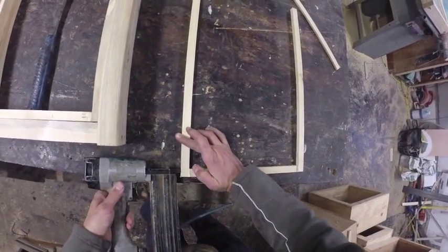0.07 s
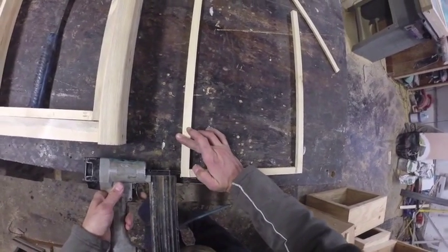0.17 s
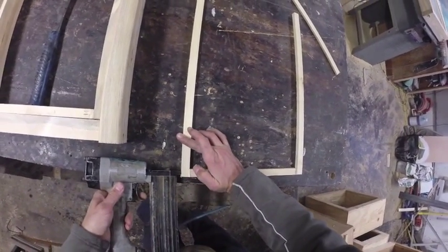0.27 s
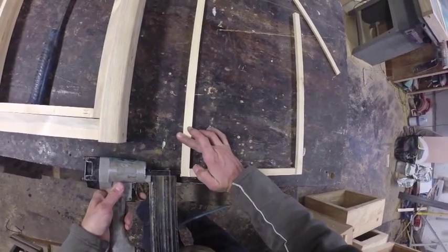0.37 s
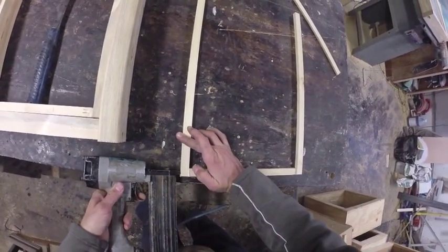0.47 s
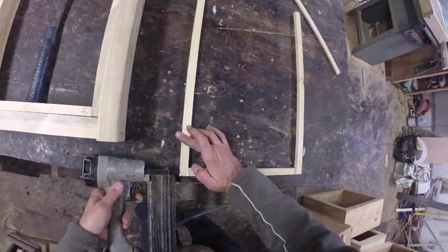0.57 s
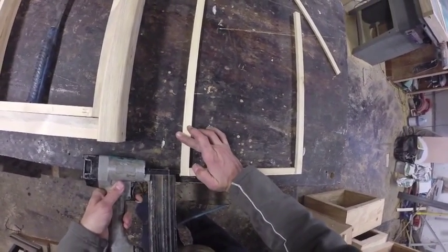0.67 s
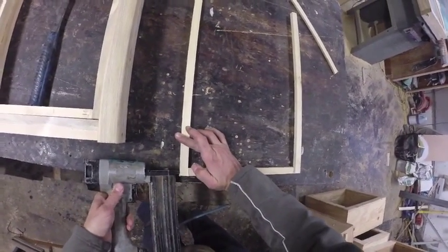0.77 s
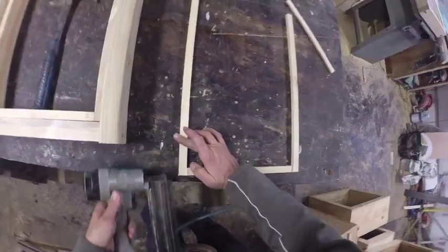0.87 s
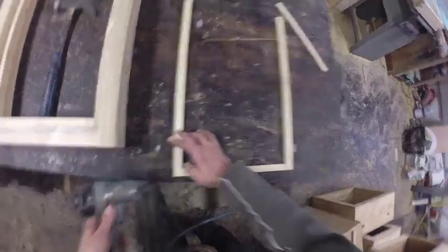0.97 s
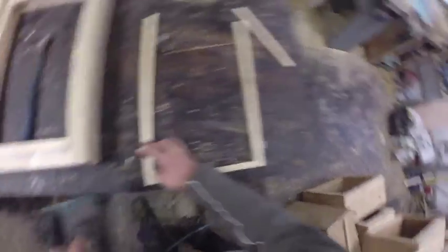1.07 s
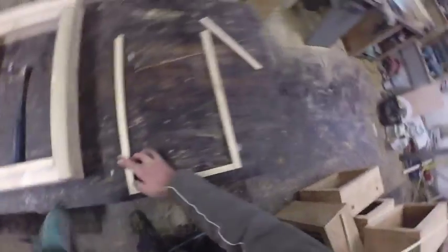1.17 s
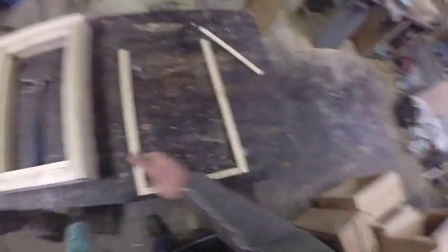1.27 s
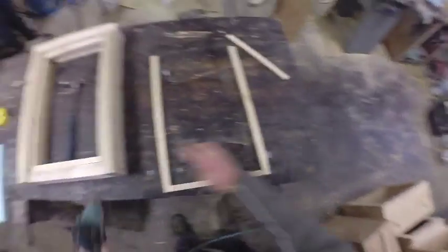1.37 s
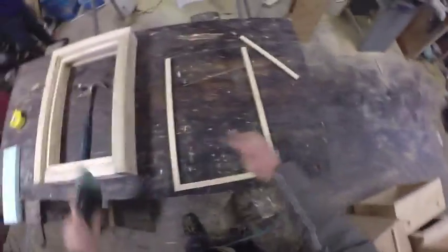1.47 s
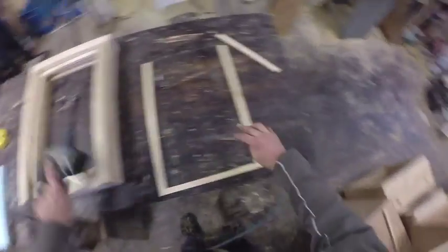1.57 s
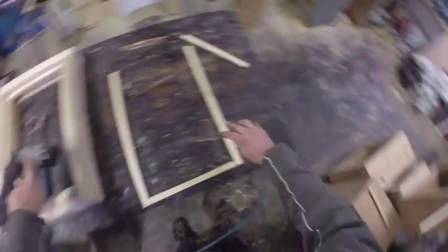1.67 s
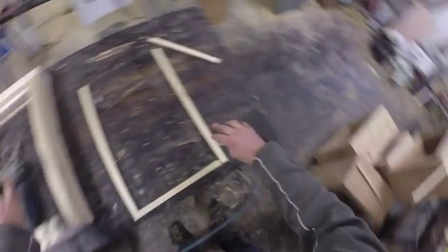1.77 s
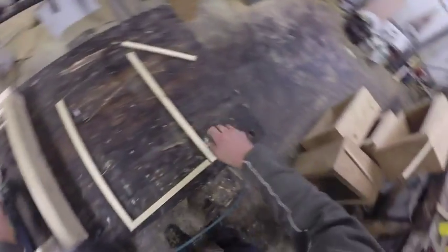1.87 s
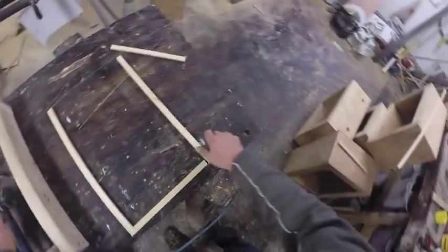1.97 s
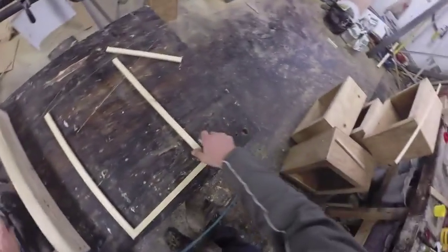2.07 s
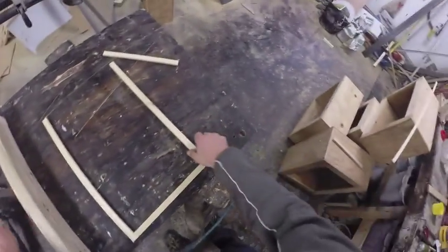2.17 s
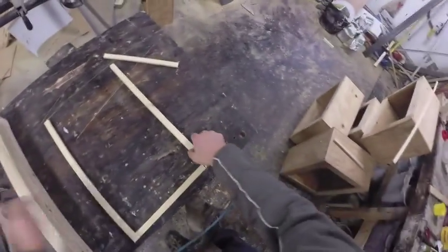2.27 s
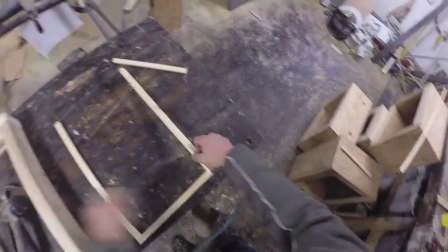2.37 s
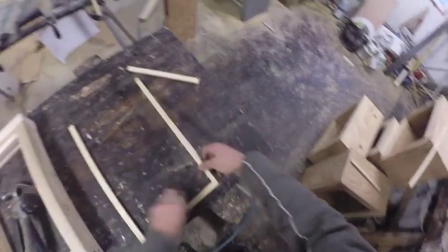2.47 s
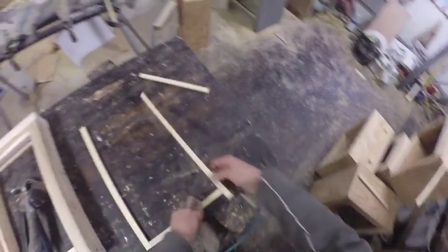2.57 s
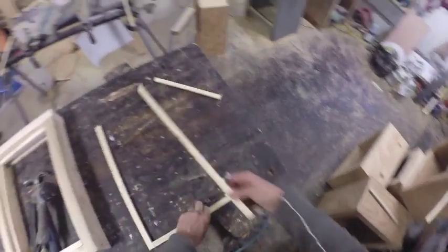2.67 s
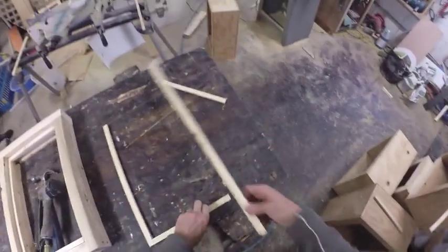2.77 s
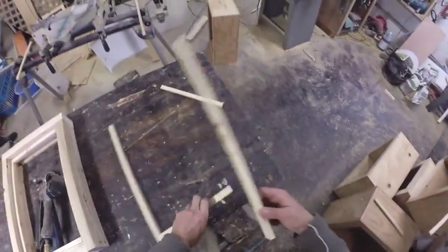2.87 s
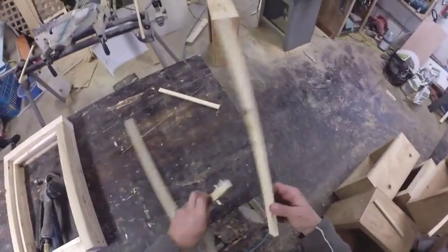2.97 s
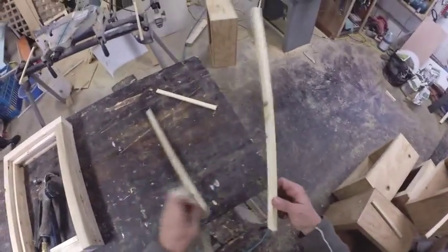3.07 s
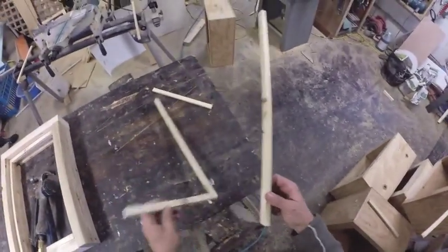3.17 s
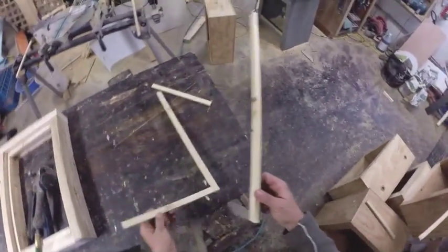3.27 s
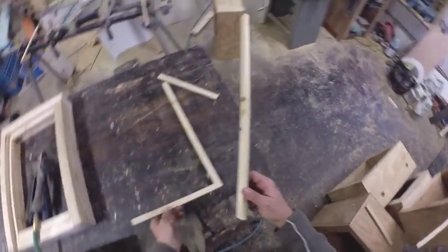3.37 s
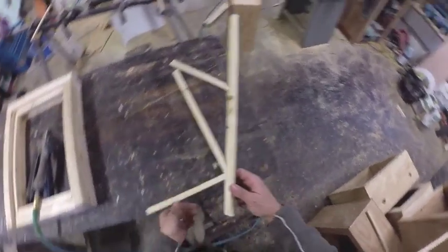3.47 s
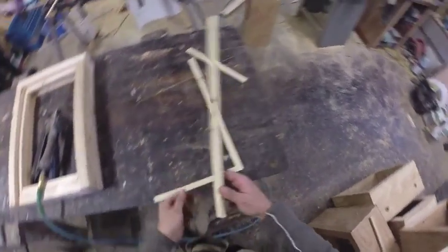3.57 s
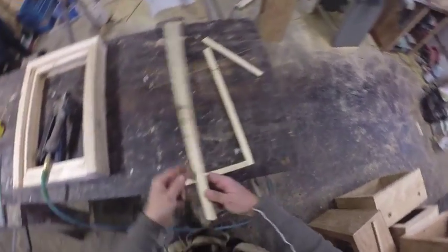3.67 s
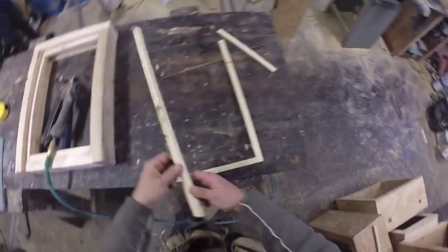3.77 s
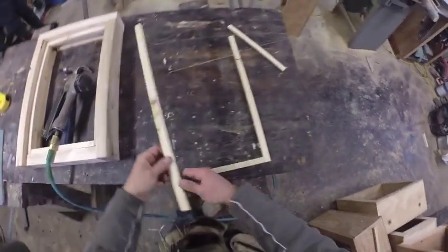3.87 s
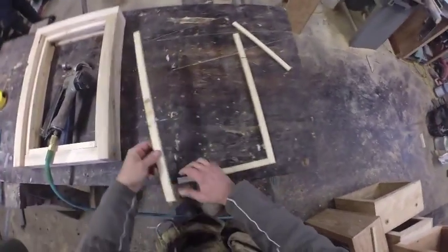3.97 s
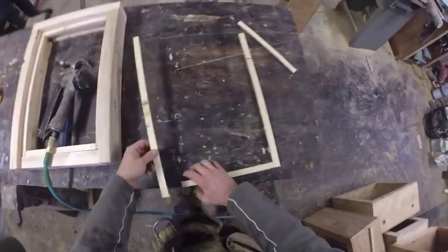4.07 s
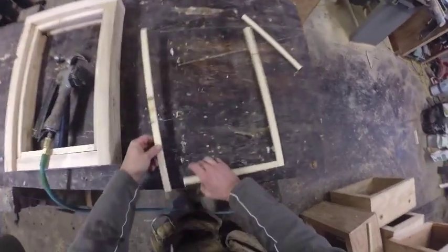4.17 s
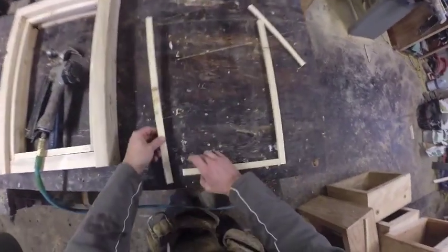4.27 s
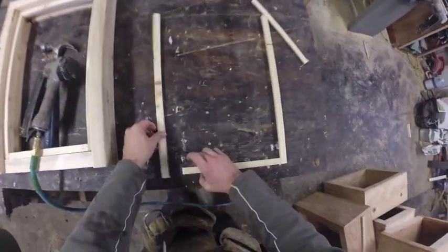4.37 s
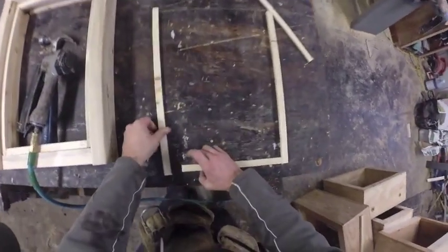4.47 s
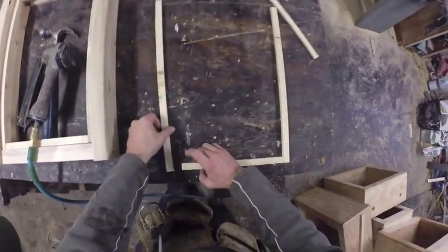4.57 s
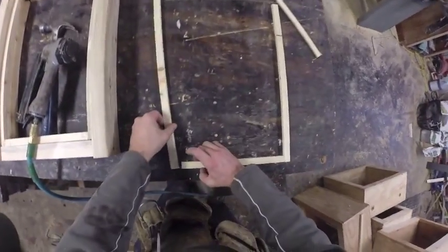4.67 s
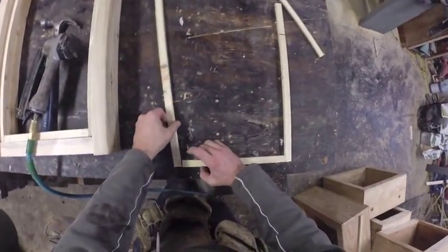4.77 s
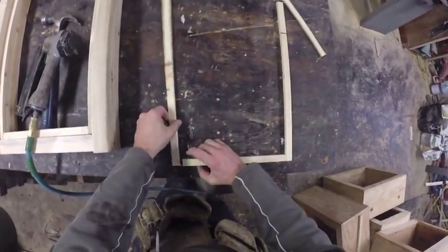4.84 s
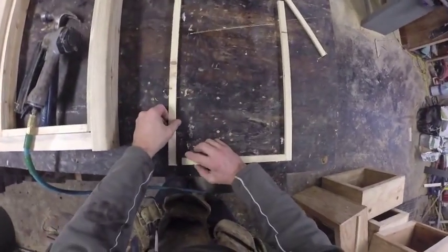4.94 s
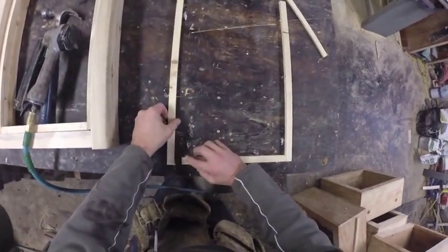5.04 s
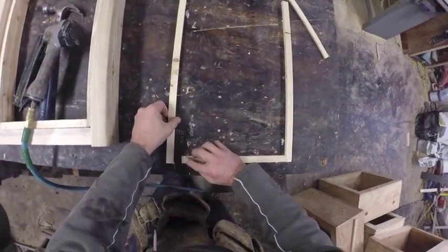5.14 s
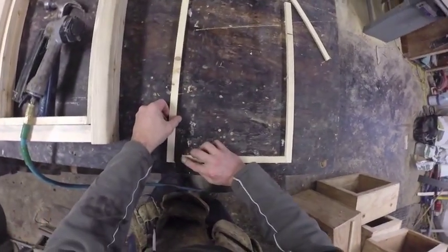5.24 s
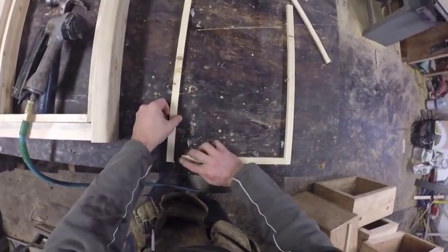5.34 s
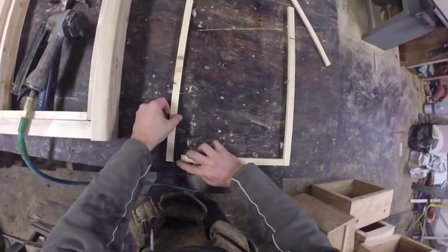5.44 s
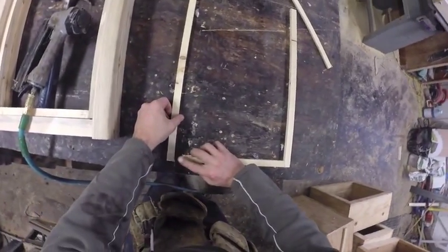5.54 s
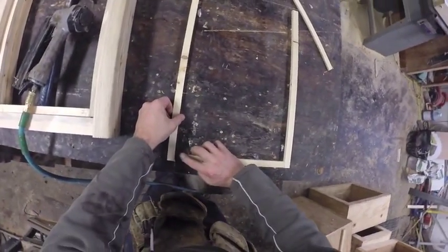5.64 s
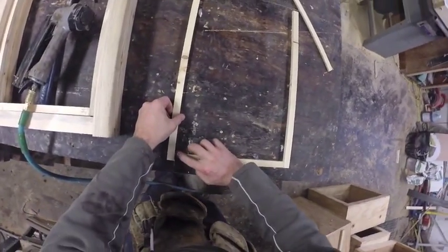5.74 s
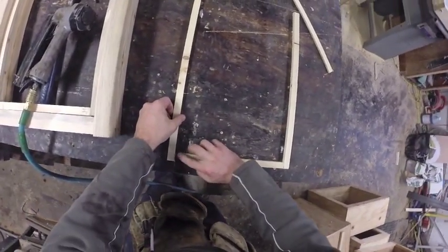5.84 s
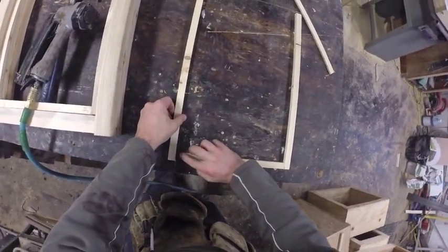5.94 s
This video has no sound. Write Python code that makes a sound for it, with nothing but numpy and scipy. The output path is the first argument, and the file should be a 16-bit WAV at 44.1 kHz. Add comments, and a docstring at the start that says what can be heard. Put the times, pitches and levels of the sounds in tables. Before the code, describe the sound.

Two sharp pneumatic nailer shots with exhaust puffs and fading hisses, then the tool thuds down and wooden strips clack on a workbench.

```python
"""A pneumatic nailer at work in a workshop, heard up close on one body-worn microphone.
Two shots come first, each a bang, a puff of exhaust and a dying hiss; valve air rushes ahead of the second.
The nailer bumps softly and clicks as it is lifted, then thuds, rattles and rocks to rest on the bench.
Then wooden strips are dragged, dropped and laid in place, and the joined frame rings.
Sleeves and hose rustle now and then, over shop noise and an air leak; the bangs hold the recorder's gain down."""
import sys
import numpy as np
from scipy import signal
from scipy.fft import rfft, irfft
from scipy.io import wavfile
from scipy.ndimage import uniform_filter1d, minimum_filter1d

SR = 44100
rng = np.random.default_rng(int(sys.argv[2]) if len(sys.argv) > 2 else 0)


def file_out(sig):
    """Save sig as 16-bit WAV at sys.argv[1]."""
    # one column per channel
    cols = np.atleast_2d(sig).T
    # limit, then scale
    lim = np.clip(cols, -1, 1)
    pcm = np.round(lim * 32767).astype(np.int16)
    wavfile.write(sys.argv[1], SR, pcm)


N = 264820
TIME = np.arange(N) / SR
AGE = np.arange(SR) / SR  # the second that follows a blow
EDGE_HZ = 15330  # upper band edge of the recorder


def amp(db):
    """Decibels to gain."""
    return 10 ** (np.asarray(db) / 20)


def evened(x):
    """Scales to rms 1."""
    return x / np.sqrt(np.mean(x ** 2) + 1e-20)


def read(points, hz):
    """Reads a spectrum along a log-frequency axis."""
    f, value = np.transpose(points)
    return np.interp(np.log(hz + 1), np.log(f + 1), value)


def follow(curve, silence_db=-120):
    """Gain at every sample from rows (s, dB); practically silent before the first row."""
    return amp(np.interp(TIME, *np.transpose(curve), left=silence_db))


def add(mix, s, sound):
    """Mixes a sound in at time s."""
    part = mix[max(round(s * SR), 0):][:len(sound)]
    part += sound[:len(part)]


def colour(x, spectrum, corner_hz=np.inf, size=4096):
    """Causal (minimum-phase) filter with the given spectrum, rolling off above a corner."""
    hz = abs(np.fft.fftfreq(size, 1 / SR))
    gain = amp(read(spectrum, hz)) / np.hypot(1, (hz / corner_hz) ** 2)
    taps = np.fft.ifft(np.exp(np.conj(signal.hilbert(np.log(gain))))).real
    return signal.fftconvolve(x, taps)[:len(x)]


def noise(spectrum, size=SR):
    """Steady coloured noise of rms 1."""
    gain = amp(read(spectrum, np.fft.rfftfreq(size, 1 / SR)))
    return evened(irfft(rfft(rng.standard_normal(size)) * gain, size))


def crowded(x, depth_db, width_hz):
    """Countless overlapping resonances: causal random peaks and dips about width_hz wide."""
    hz = np.arange(0, SR / 2, width_hz)
    heights = np.clip(rng.standard_normal(len(hz)), -2, 2)
    return colour(x, np.c_[hz, depth_db * heights])


def air(spectrum, depth_db=6.5, width_hz=110):
    """Rushing air of rms 1, coloured by the cavities of the tool and the surfaces near it."""
    return evened(crowded(noise(spectrum), depth_db, width_hz))


# How the workshop dies away. Each row: band centre in Hz, t60 in s.
ROOM_DECAY = [(60, 0.95), (250, .5), (700, 0.51), (2000, 0.41), (5000, 0.37), (9000, .3), (16000, 0.28)]


def die_away(x, age):
    """Lets each band of a one-second sound fade as fast as the room swallows it."""
    hz, z = np.fft.rfftfreq(SR, 1 / SR), rfft(x)
    centres, t60s = np.transpose(ROOM_DECAY)
    out = np.zeros(SR)
    for share, t60 in zip(np.eye(len(centres)), t60s):
        band = irfft(z * read(np.c_[centres, share], hz), SR)
        out += band * np.exp(-np.log(1000) * age / t60)
    return out


def room_tail(build_s=0.0038):
    """Dense reflections of the shop, of energy 1."""
    tail = die_away(rng.standard_normal(SR), AGE) * (1 - np.exp(-AGE / build_s))
    return tail / np.linalg.norm(tail)


def ring(modes, favoured_hz=1, favour_db=0, spread=0.042):
    """Dying modes; those that move most at the struck spot ring louder."""
    hz, db, t60 = np.transpose(modes)[:, :, None]
    db = db + favour_db * np.exp(-(np.log(hz / favoured_hz) / spread) ** 2)
    return (amp(db) * np.exp(-np.log(1000) * AGE / t60) * np.sin(2 * np.pi * hz * AGE)).sum(0)


def blow(spectrum, corner_hz, chatter_s, chatter_db, room_db, grain_db=3, grain_hz=70, size=1024):
    """First contact, brief chatter and the room, through the body's resonances; rms 1 over the attack."""
    chatter = rng.standard_normal(SR) * np.exp(-AGE / chatter_s)
    force = (AGE == 0) + amp(chatter_db) * chatter / np.linalg.norm(chatter)
    force = force + amp(room_db) * room_tail()
    sound = crowded(colour(force, spectrum, corner_hz), grain_db, grain_hz)
    return sound / np.std(sound[:size])


def slips(per_s, uneven_db):
    """Random tiny jerks of uneven strength."""
    happens = rng.random(N) < per_s / SR
    boost_db = uneven_db * np.minimum(rng.exponential(1, N), 2)
    return rng.standard_normal(N) * happens * amp(boost_db)


def wander(step_s):
    """A random course between -1 and 1 that turns every step_s."""
    return np.interp(TIME / step_s, np.arange(SR), np.clip(rng.standard_normal(SR), -1, 1))


SHOP_DB = -48.5  # rms
# Steady noise of the shop. Each row: frequency in Hz, relative level in dB per Hz.
SHOP_SPECTRUM = [(20, -4), (45, -6), (75, 0.5), (120, -4), (190, -10), (300, -13.5), (480, -18),
                 (900, -21.5), (1800, -28), (3800, -28), (5500, -31.5), (8200, -37.5), (10500, -40.5),
                 (15500, -49)]
# Air leak at the hose coupling, louder while the nailer faces the microphone. Each row: time in s, level in dB.
LEAK_LEVEL = [(.6, -80), (1.05, -59.5), (2.7, -60), (3.4, -70.5), (6, -67.5)]
# Colour of that leak. Each row: frequency in Hz, relative level in dB per Hz.
LEAK_SPECTRUM = [(2000, -29), (7000, -6), (10800, 3), (12500, -4.5), (15000, -4)]


def background():
    """The shop's low noise and the thin leak of the air line."""
    shop = amp(SHOP_DB) * noise(SHOP_SPECTRUM, size=N)
    leak = follow(LEAK_LEVEL) * noise(LEAK_SPECTRUM, size=N)
    return shop + leak


# Sleeves and hose sliding as the arms move.
# Each row: time of the peak in s, level in dB, half length in s, centre in Hz.
SWISHES = [(1.687, -38.5, 0.048, 450), (2.945, -42, 0.032, 250), (4.313, -40, 0.039, 220),
           (4.701, -47, 0.02, 348), (4.946, -47.5, 0.037, 306)]


def swishes(low_db=-20, high_db=-15, top_db=-44):
    """Soft rubbing that swells and fades with each arm movement."""
    out = np.zeros(N)
    for s, db, half_s, hz in SWISHES:
        rub = noise([(hz / 3, low_db), (hz, 0), (hz * 2, high_db), (hz * 20, top_db)], size=N)
        out += amp(db) * rub / np.cosh((TIME - s) / half_s)
    return out


DRAG_STOP_S = 0.025
# A strip dragged over the bench, gathering speed until it stops.
# Each row: start in s, length in s, level at the end in dB.
DRAGS = [(2.897, 0.39, -39), (4.241, 0.1, -45)]


def strokes(growth):
    """Gain of the drags: a power of the strip's steadily rising speed, dying as the strip stops."""
    out = np.zeros(N)
    for s, length, db in DRAGS:
        speed = np.minimum(AGE / length, 1)
        stopping = np.exp(-np.maximum(AGE - length, 0) / DRAG_STOP_S)
        add(out, s, amp(db) * speed ** growth * stopping)
    return out


# Bending modes of a loose strip, free of the hand.
# Each row: frequency in Hz, level when struck in dB, t60 in s, level when rubbed in dB.
STRIP_MODES = [(934, 0, 0.28, 2), (1743, 2.5, 0.35, 1.5), (2763, -15.5, 0.16, 5), (3970, -14, 0.086, -1),
               (5140, -22, 0.1, -4), (6400, -16, 0.05, -9)]


def gripped_modes(damping_s=0.007):
    """The strip's modes one by one, as rubbing wakes them and the hand damps them."""
    grip = np.exp(-AGE / damping_s)
    return [ring([(hz, rubbed_db, t60)]) * grip for hz, _, t60, rubbed_db in STRIP_MODES]


def strip_ring(split=0.015, twin_db=-8):
    """A strip bends in two planes, so each mode has a slightly higher twin that beats with it."""
    out = np.zeros(SR)
    for hz, db, t60, _ in STRIP_MODES:
        out += ring([(hz, db, t60), (hz * (1 + split), db + twin_db, t60)])
    return out


TICK_CORNER_HZ = 7000
# Colour of wood catching on wood. Each row: frequency in Hz, relative level in dB per Hz.
TICK_SPECTRUM = [(60, -2), (300, 20), (900, -0.5), (1800, 2.5), (2600, -2.5), (4500, 8.5), (6300, 0.5),
                 (8000, -6.5), (16000, -23)]
# Colour of the rubbing itself. Each row: frequency in Hz, relative level in dB per Hz.
DRAG_SPECTRUM = [(60, -3), (250, 13.5), (500, 7), (1300, 0), (2200, -7), (4000, -17), (7000, -32),
                 (16000, -34)]


def drag(ring_db=-8.0, wander_db=7, wander_s=0.022, waver_s=0.0002, catch_db=-11, room_db=-2):
    """Uneven slips and sparser bright catches; strip modes swell and waver as the contact moves along."""
    rub = slips(per_s=850, uneven_db=5)
    catches = slips(per_s=260, uneven_db=8)
    rung = np.zeros(N)
    for mode in gripped_modes():
        swelling = signal.fftconvolve(rub * amp(wander_db * wander(wander_s)), mode)[:N]
        # a wandering delay makes the pitch waver
        rung += np.interp(TIME + waver_s * wander(wander_s), TIME, swelling)
    direct = strokes(growth=1.2) * evened(colour(rub, DRAG_SPECTRUM))
    direct += amp(ring_db) * strokes(growth=0.59) * evened(rung)
    bright = evened(colour(catches, TICK_SPECTRUM, TICK_CORNER_HZ))
    direct += amp(catch_db) * strokes(growth=0.22) * bright
    return direct + amp(room_db) * signal.fftconvolve(direct, room_tail())[:N]


# The sharpest catches and cracks of wood on wood. Each row: start in s, level in dB.
TICKS = [(2.969, -42), (2.988, -42), (3.021, -52), (3.037, -38.5), (3.0763, -38.5), (3.095, -47),
         (3.109, -38.5), (3.136, -39), (3.238, -49.5), (3.270, -40.5), (3.31, -45.5), (3.4517, -25.5),
         (3.5885, -34)]


def ticks():
    """Short bright blows of wood on wood, with little of the room."""
    out = np.zeros(N)
    for s, db in TICKS:
        tick = blow(TICK_SPECTRUM, TICK_CORNER_HZ, chatter_s=0.0021, chatter_db=14.0, room_db=-2.5)
        add(out, s, amp(db) * tick)
    return out


# bench ring under a firm knock, relative to the knock; duller knocks ring it more
KNOCK_BENCH_DB, FIRM_HZ, SOFT_DB_PER_OCTAVE = -17.5, 4000, 3
# Modes of the bench, for knocks and thuds alike. Each row: frequency in Hz, level in dB, t60 in s.
BENCH_MODES = [(65, -25, 0.62), (145, 0, 0.41), (188, -3, 0.25), (251.4, 8, 0.36), (285, -5.5, 0.35),
               (338, -1.5, 0.5), (387, -17, 0.13), (475, -5, 0.45), (570, -15, 0.37), (657, -12, 0.29),
               (764, -11, 0.65), (836, -11, 0.29)]
# Colour of a knock. Each row: frequency in Hz, relative level in dB per Hz.
KNOCK_SPECTRUM = [(25, -19), (70, -7), (120, -16.5), (190, -2.5), (480, -0.5), (750, -5.5), (1100, -5.5),
                  (1600, -4), (2300, -12.5), (3600, -11.5), (4250, -15.5), (5000, -22.5), (6500, -24.5),
                  (8500, -39), (16000, -54)]
# Strips knocking on the bench. Each row: start in s, level in dB, dulling corner in Hz, frequency that
# the struck spot favours in Hz, strip ring in dB relative to the knock, room in dB relative to first contact.
KNOCKS = [(3.4512, -20, 5500, 746, -13, 17), (3.495, -28.5, 5000, 657, -21, 11.5),
          (3.5882, -21, 4000, 260, -36, 14.5), (4.310, -39.5, 2300, 188, 6, 12.5),
          (4.472, -18.5, 3340, 345, -20, 11.5), (4.515, -29, 2440, 475, -22, 13),
          (4.675, -47, 764, 145, -27, 15)]


def knocks():
    """Light strips clack on the bench; bench and strip ring on."""
    out = np.zeros(N)
    for s, db, corner_hz, spot_hz, strip_db, room_db in KNOCKS:
        clack = blow(KNOCK_SPECTRUM, corner_hz, chatter_s=0.0033, chatter_db=15,
                     room_db=room_db, grain_hz=54.9)
        add(out, s, amp(db) * clack)
        bench_db = KNOCK_BENCH_DB + SOFT_DB_PER_OCTAVE * np.log2(FIRM_HZ / corner_hz)
        add(out, s, amp(db + bench_db) * ring(BENCH_MODES, spot_hz, favour_db=16.5, spread=0.07))
        add(out, s, amp(db + strip_db) * strip_ring())
    return out


SEAT_S, SEAT_DB = 4.472, -28.5
# Modes of the strips pushed together into a frame. Each row: frequency in Hz, level in dB, t60 in s.
FRAME_MODES = [(539, 2.5, 0.14), (732, 2.5, 0.32), (843, 2, 0.25), (1134, 2, 0.3), (1584, -4, 0.33),
               (2140, -5.5, 0.36), (2830, -16, 0.26), (3410, -11, 0.22)]


def frame():
    """A strip lands against its neighbour and the joined frame rings."""
    out = np.zeros(N)
    add(out, SEAT_S, amp(SEAT_DB) * ring(FRAME_MODES))
    return out


# Modes of the nailer's steel parts. Each row: frequency in Hz, level in dB, t60 in s.
STEEL_MODES = [(2353, -8, 0.18), (5570, -8.5, 0.17), (7630, -9, 0.36), (7785, -5, 0.38)]
# Colour of a click. Each row: frequency in Hz, relative level in dB per Hz.
CLICK_SPECTRUM = [(100, 1), (700, -7.5), (1400, -2), (2500, -3.5), (3800, -4), (5500, 0.5), (8000, -9),
                  (16000, -21)]
# Steel parts springing back or jolted. Each row: start in s, level in dB, steel ring in dB.
CLICKS = [(0.1742, -28, -54), (1.209, -54, -76), (1.242, -36.5, -46), (1.294, -38.5, -40),
          (1.317, -41.5, -47), (1.334, -46.5, -42), (4.489, -43.5, -74)]


def clicks():
    """Steel parts of the nailer click and ring."""
    out = np.zeros(N)
    for s, db, steel_db in CLICKS:
        click = blow(CLICK_SPECTRUM, np.inf, chatter_s=0.0015, chatter_db=9.0, room_db=5.0)
        add(out, s, amp(db) * click + amp(steel_db) * ring(STEEL_MODES))
    return out


# Modes of the nailer's magazine. Each row: frequency in Hz, level in dB, t60 in s.
MAGAZINE_MODES = [(486, 8, 0.11), (630, 1.5, 0.15), (1050, -2, .2), (1445, -5.5, 0.24), (2130, -13.5, 0.13)]


def rattle(corner_hz, per_s=260, settle_s=0.019, uneven_db=4):
    """Ever weaker contacts ring the loose magazine; a duller thud wakes less of its treble."""
    contacts = slips(per_s, uneven_db)[:SR] * np.exp(-AGE / settle_s)
    rung = evened(signal.fftconvolve(contacts, ring(MAGAZINE_MODES))[:SR])
    return signal.lfilter(*signal.butter(2, min(corner_hz, EDGE_HZ), fs=SR), rung)


THUD_BENCH_DB, RATTLE_DB = -6, -24  # relative to the thud; the rattle before its dulling
# Colour of a thud. Each row: frequency in Hz, relative level in dB per Hz.
THUD_SPECTRUM = [(30, -24), (65, -2.5), (100, -2.5), (170, -0.5), (260, 4), (380, -0.5), (560, -8.5),
                 (850, -10), (1450, -15.5), (2500, -23.5), (5000, -29.5), (7000, -30), (10000, -43),
                 (16000, -49)]
# The nailer bumping the work as it is lifted, then touching down and rocking to rest.
# Each row: start in s, level in dB, dulling corner in Hz, frequency that the struck spot favours in Hz.
THUDS = [(0.981, -32, 224, 145), (2.135, -18.5, 4950, 334), (2.138, -12.5, 8900, 338),
         (2.2336, -17.5, 12100, 145), (2.2414, -23.5, 3000, 145), (2.3252, -22.5, 1970, 145),
         (2.492, -33.5, 1530, 240)]


def thuds():
    """The heavy tool strikes wood, rings the bench and rattles."""
    out = np.zeros(N)
    for s, db, corner_hz, spot_hz in THUDS:
        thud = blow(THUD_SPECTRUM, corner_hz, chatter_s=0.0087, chatter_db=18.5, room_db=17.5)
        add(out, s, amp(db) * thud)
        add(out, s, amp(db + THUD_BENCH_DB) * ring(BENCH_MODES, spot_hz, favour_db=4.0))
        add(out, s, amp(db + RATTLE_DB) * rattle(corner_hz))
    return out


# Colour of the valve air. Each row: frequency in Hz, relative level in dB per Hz.
FEED_SPECTRUM = [(40, -9), (90, -8.5), (480, -7.5), (850, -21.5), (1600, -13), (2400, -17.5), (3500, -2.5),
                 (5400, -6.5), (6500, -11.5), (9000, -14.5), (13600, -9), (16000, -14)]
# Air rushing through the trigger valve ahead of a shot. Each row: start in s, level in dB, length in s.
FEEDS = [(0.6789, -12, .044)]


def valve(fall_db_per_s=-220, open_s=0.00049, shut_db=-14):
    """A hiss that opens at once, sags as the pressure evens out and is cut short."""
    out = np.zeros(N)
    for s, db, length in FEEDS:
        level_db = db + fall_db_per_s * AGE + shut_db * (AGE > length)
        opening = 1 - np.exp(-AGE / open_s)
        add(out, s, amp(level_db) * opening * air(FEED_SPECTRUM, depth_db=4.0))
    return out


def bang(hz=1210, peak_s=0.0013, width_s=0.00066, push_hz=480, push_db=-20, crack_db=-19,
         crack_s=0.0058, stop_s=0.0049, stop_db=-5, stop_width_s=0.000091):
    """The piston drives the brad in a few violent cycles over a slower push, then slaps its bumper."""
    lag = AGE - peak_s
    swing = np.exp(-(lag / width_s) ** 2 / 2) * np.cos(2 * np.pi * hz * lag)
    push = np.exp(-(lag / width_s / 2) ** 2 / 2) * np.cos(2 * np.pi * push_hz * lag)
    u = (AGE - stop_s) / stop_width_s
    slap = (1 - u ** 2) * np.exp(-u ** 2 / 2)
    crack_spectrum = [(100, 4.0), (500, 1.0), (3500, -7.5), (7000, -9.0), (16000, -22)]  # Hz, dB per Hz
    crack = noise(crack_spectrum) * np.exp(-AGE / crack_s)
    return swing + amp(push_db) * push + amp(stop_db) * slap + amp(crack_db) * crack


WASH_DB, BLEED_DB = -31.5, -44  # relative to the bang
BLEED_S = 0.13  # how long the air bleeds before the room swallows it
# Colours of the wash, the puff and the bleeding air. Each row: frequency in Hz, relative level in dB per Hz.
WASH_SPECTRUM = [(50, -22), (200, -5), (480, -6), (760, -13), (1170, 4), (1800, -7.5), (2600, -7),
                 (4400, -14.5), (7000, -20), (12000, -31), (16000, -40)]
PUFF_SPECTRUM = [(30, 0), (100, 14), (250, -6), (700, -3.5), (1300, -8.5), (3000, -8.5), (6000, -7.5),
                 (9000, -5.5), (12000, -8.5), (16000, -0.5)]
BLEED_SPECTRUM = [(40, -7.5), (130, 9), (330, -9.5), (750, -7), (1200, 2.5), (1900, -8.5), (2700, -4.5),
                  (4500, -10.5), (7600, -8), (11000, -13), (16000, -23.5)]
# The two shots, close to the microphone.
# Each row: start in s, bang level in dB, time of the exhaust puff in s, puff level in dB.
SHOTS = [(0.0001, 16.5, .1478, -5), (0.7377, 16, .817, -8.5)]


def shots(wash_fall_db_per_s=-35, wash_cut_s=0.0043, puff_width_s=0.0031, skirt_db=-10,
          skirt_s=.011, bleed_fall_db_per_s=-18):
    """Bang; its wash hangs in the room until the exhaust puffs; the rest of the air bleeds away."""
    out = np.zeros(N)
    for s, bang_db, puff_s, puff_db in SHOTS:
        add(out, s, amp(bang_db) * bang())
        since_puff = AGE - (puff_s - s)
        wash_gain = amp(bang_db + WASH_DB + wash_fall_db_per_s * AGE)
        wash_gain = wash_gain * np.exp(-np.maximum(since_puff, 0) / wash_cut_s)
        add(out, s, wash_gain * air(WASH_SPECTRUM, depth_db=4.5))
        puff = np.exp(-(since_puff / puff_width_s) ** 2 / 2)
        puff += amp(skirt_db) * np.exp(-abs(since_puff) / skirt_s)
        add(out, s, amp(puff_db) * puff * air(PUFF_SPECTRUM))
        bleed = die_away(air(BLEED_SPECTRUM, depth_db=0.0), np.maximum(AGE - BLEED_S, 0))
        add(out, puff_s, amp(bang_db + BLEED_DB + bleed_fall_db_per_s * AGE) * bleed)
    return out


def scene():
    """All sources at the one microphone."""
    bed = background() + swishes()
    wood = drag() + ticks() + knocks() + frame()
    nailer = clicks() + thuds() + valve() + shots()
    return (bed + wood + nailer)[None]


LIMIT_DB, SENSE_S = -5, 0.0055  # threshold and averaging time
HOLD_S, RECOVER_DB_PER_S = 0.5, 23.5


def gain_control(x):
    """Cuts the gain by the excess over the threshold, holds it there, then recovers slowly."""
    power = uniform_filter1d(x ** 2, round(SENSE_S * SR), mode="constant")
    over_db = np.maximum(10 * np.log10(abs(power) + 1e-12) - LIMIT_DB, 0)
    hold = round(HOLD_S * SR)
    # the largest excess of the last HOLD_S
    held_db = -minimum_filter1d(-over_db, hold, origin=(hold - 1) // 2, mode="constant")
    recovery_db = RECOVER_DB_PER_S * TIME
    cut_db = np.maximum.accumulate(held_db + recovery_db, axis=-1) - recovery_db
    return x / amp(cut_db)


def record(dry):
    """The bangs duck the gain and still overload the recorder; then the band limit."""
    clipped = np.clip(gain_control(dry), -1, 1)
    lowpass = signal.firwin(1023, EDGE_HZ, window=("kaiser", 9), fs=SR)
    return signal.oaconvolve(clipped, lowpass[None], "same")


dry = scene()
out = record(dry)
file_out(out)
```